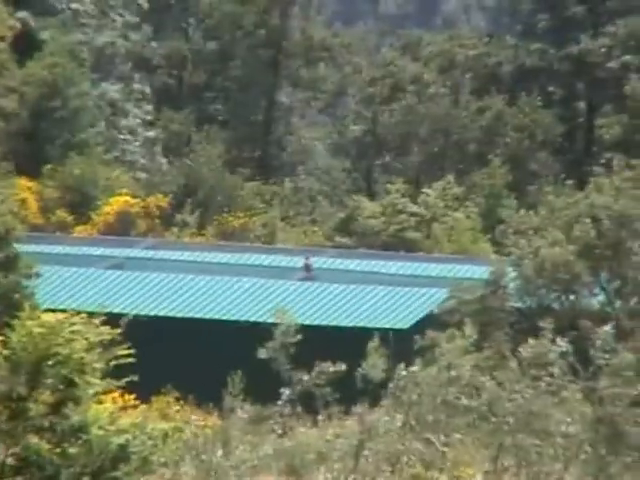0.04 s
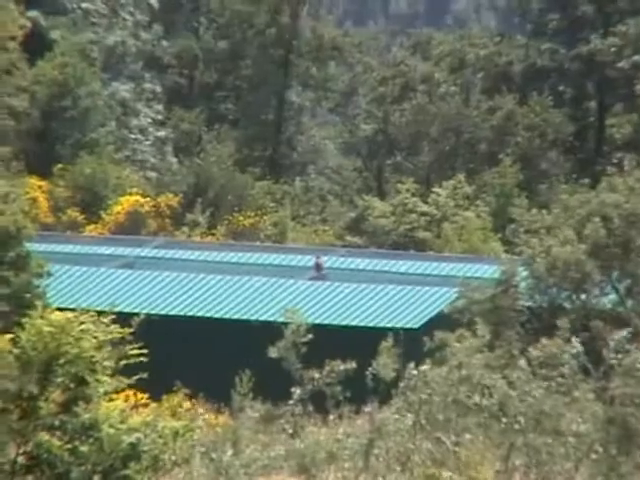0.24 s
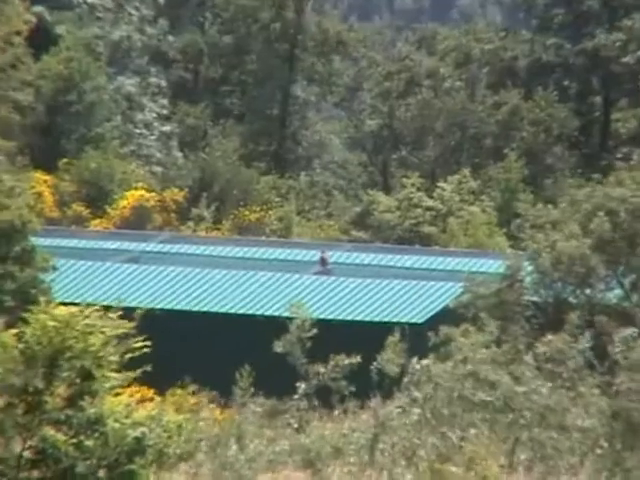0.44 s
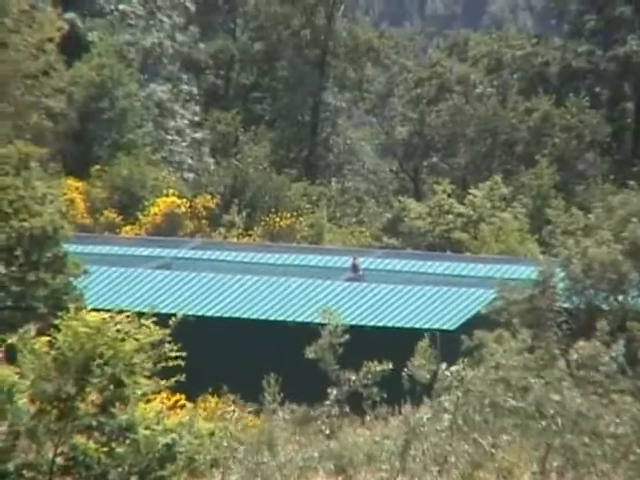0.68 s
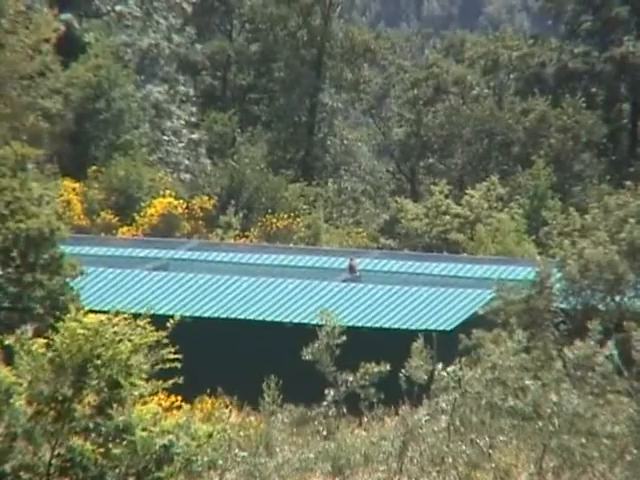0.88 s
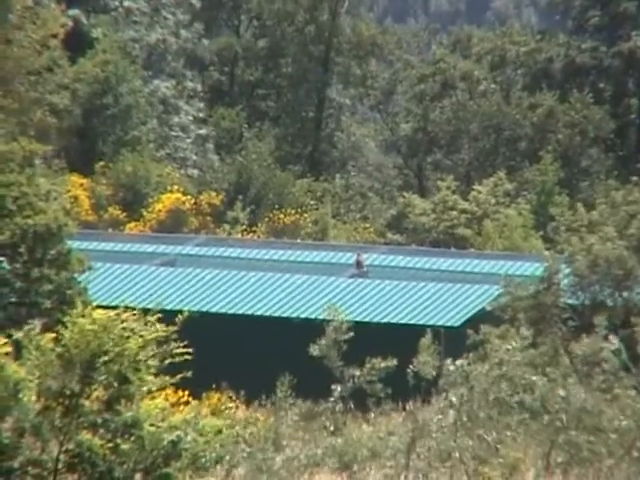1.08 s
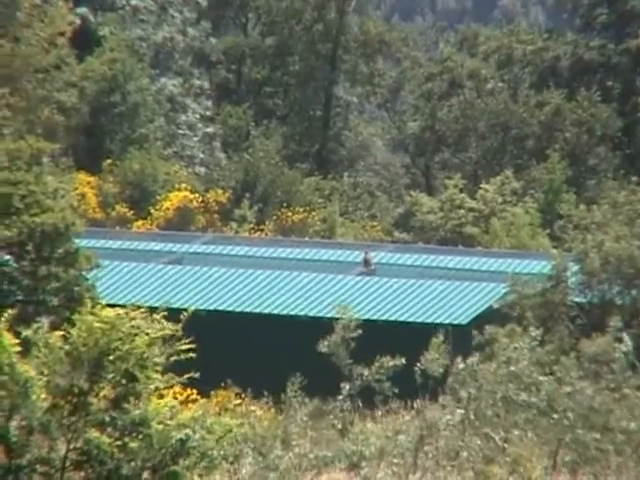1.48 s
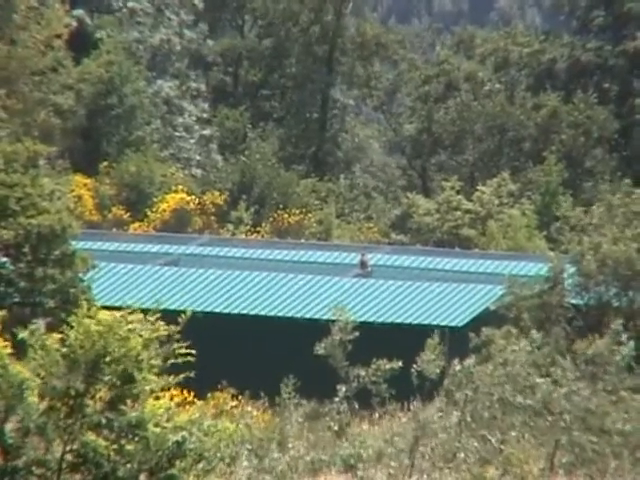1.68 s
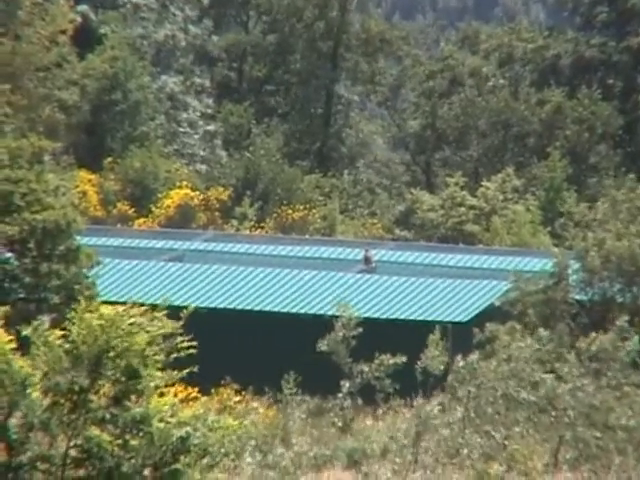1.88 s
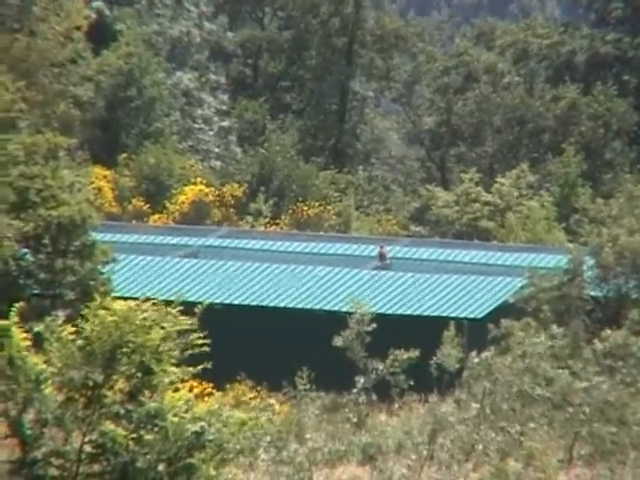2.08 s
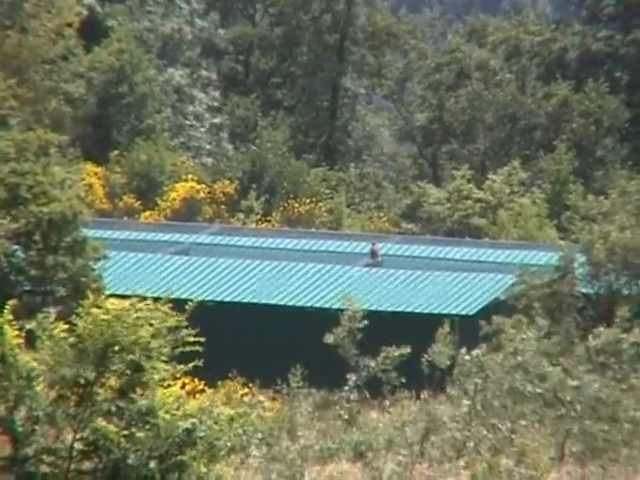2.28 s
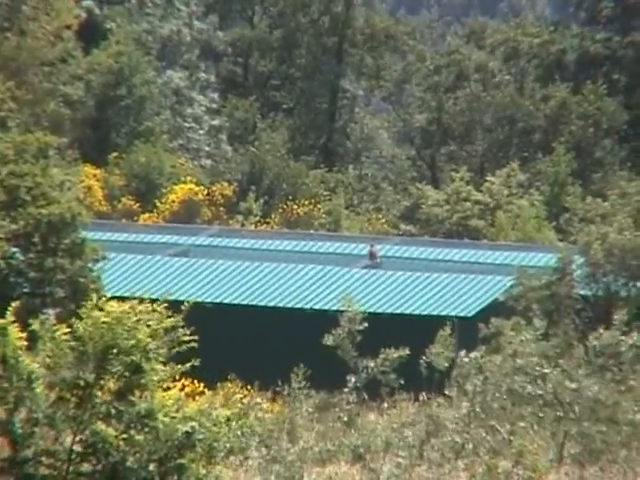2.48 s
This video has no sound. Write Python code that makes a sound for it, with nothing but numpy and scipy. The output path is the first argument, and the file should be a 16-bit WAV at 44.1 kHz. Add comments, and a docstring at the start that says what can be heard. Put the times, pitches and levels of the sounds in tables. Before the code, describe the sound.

Uneven gusts of wind rumble on the microphone, with leaves rustling softly behind.

```python
"""Outdoors in gusty wind, some way from a wood, on a camera's own stereo microphone. The wind
strikes its two ports in puffs, each a short burst of eddies, heard wide and partly in opposite
phase. Far off the trees rush steadily, with two faint chirps; nearer, leaves rustle as the
breeze eases. The camera's own motor adds a very faint whine."""
import sys
import numpy as np
from scipy import signal
from scipy.fft import rfft, irfft, next_fast_len
from scipy.io import wavfile
from scipy.ndimage import uniform_filter1d, map_coordinates

SR = 44100
rng = np.random.default_rng(int(sys.argv[2]) if len(sys.argv) > 2 else 0)


def int16_out(signal):
    """Quantize to a 16-bit WAV file."""
    q = np.round(np.clip(np.atleast_2d(signal).T, -1, 1) * 32767)
    wavfile.write(sys.argv[1], SR, q.astype(np.int16))


N = 116865

# The far trees. Each row: frequency in Hz, relative density in dB.
TREE_SPECTRUM = [(20, -29), (50, 0), (130, 3), (260, 2.5), (430, -2), (580, 0.5), (830, -2), (1100, -1.5),
                 (1400, -3), (1900, -9.5), (3500, -25), (9000, -63)]
# Their width. Each row: frequency in Hz, left-right likeness (1 is mono).
TREE_LIKENESS = [(60, -0.25), (250, 0.21), (600, 0.82), (1400, 0.59)]
# Far chirps, probably birds. Each row: middle and length in seconds, pitch in Hz, level in dB.
FAR_CHIRPS = [(0.733, 0.037, 2770, -64), (1.952, 0.08, 3600, -61)]
# The breeze in the nearby leaves. Each row: time in seconds, level in dB.
BREEZE_LEVEL = [(0, -52.4), (.35, -52), (1.1, -54), (1.9, -55), (2.65, -55)]
# Their rustle. Each row: frequency in Hz, relative density in dB.
LEAF_SPECTRUM = [(500, -19), (1500, -3.5), (2600, 1), (4000, 0.5), (5000, -1), (6500, -1.5), (8500, -4.5),
                 (12000, -8.5), (15700, -11)]
# Its width. Each row: frequency in Hz, left-right likeness.
LEAF_LIKENESS = [(1500, 0.23), (3500, 0.5), (7000, 0.69), (15000, 0.71)]
# Its lean to the left. Each row: frequency in Hz, left over right in dB.
LEAF_PAN = [(4000, 2.5), (8000, 1.1)]
# The motor's whine. Each row: multiple of its rate, level in dB.
MOTOR_OVERTONES = [(7, -83), (8, -80), (9, -78), (11, -76.5), (13, -76), (14, -79), (23, -81)]
# Puffs on the microphone. Each row: peak time and length in seconds, relative level in dB,
# left port over right in dB, tilt in dB per octave.
WIND_PUFFS = [(0.202, 0.04, -48, 9, -12), (0.227, 0.035, -36.5, -4, -6), (0.244, 0.022, -37.5, -1.5, -2.5),
              (0.28, 0.031, -41, -3, -8), (0.358, 0.041, -32.5, -3.5, -3), (0.364, 0.012, -30, -8.5, -0.5),
              (0.381, 0.027, -28, 8.5, -3.5), (0.388, 0.0047, -27, 8, 0.5), (0.413, 0.014, -29.5, 8, 1),
              (0.449, 0.038, -31.5, 0, -3), (0.503, 0.02, -43.5, -10, -2.5), (0.554, 0.034, -39.5, 5, -3),
              (0.641, 0.054, -49.5, 8, -7.5), (0.693, 0.047, -44.5, 13.5, -5.5),
              (0.747, 0.015, -41.5, 17, -3), (0.776, 0.038, -37.5, 5.5, -7.5),
              (0.793, 0.0047, -23.5, 8, -6), (0.806, 0.011, -25.5, 8.5, 1), (0.802, 0.0057, -27, 6.5, 7),
              (0.817, 0.036, -34, 9, 0), (0.85, 0.052, -31, 7, 1.5), (0.905, 0.024, -33.5, 7.5, 0.5),
              (0.929, 0.011, -32, 5, 6), (0.936, 0.025, -26, 5.5, 2), (0.97, 0.049, -31.5, 6.5, 1.5),
              (1.049, 0.049, -40, 6.5, 3.5), (1.067, 0.0071, -32, 6, 2), (1.086, 0.042, -42.5, 8, 1.5),
              (1.116, 0.034, -41, -5, 1.5), (1.217, 0.035, -35.5, 3, 1), (1.238, 0.057, -45, 6.5, -0.5),
              (1.293, 0.027, -43.5, -10, 1), (1.38, 0.057, -43, 1.5, -2.5), (1.431, 0.041, -41.5, 5.5, -3),
              (1.477, 0.049, -45, 5, -2.5), (1.517, 0.014, -34.5, 8, -3.5), (1.555, 0.035, -28, 1, -0.5),
              (1.589, 0.055, -30, -6.5, 1.5), (1.612, 0.0082, -22.5, -4.5, -2), (1.639, 0.032, -34, -8, 0),
              (1.669, 0.037, -29.5, 6.5, 0), (1.713, 0.04, -33.5, 7.5, 2.5), (1.742, 0.045, -35, 5, -0.5),
              (1.852, 0.047, -39.5, 0, 2.5), (1.906, 0.0064, -31, 0, 3), (1.924, 0.032, -32, -0.5, 0.5),
              (1.96, 0.057, -44, 11, -2.5), (2.014, 0.025, -42, -6.5, 1.5),
              (2.081, 0.02, -43.5, 10.5, -0.5), (2.154, 0.045, -45.5, -7.5, -2),
              (2.205, 0.041, -50.5, 3, -4.5), (2.283, 0.049, -45.5, 6.5, -1.5),
              (2.325, 0.027, -47, 10, 0.5), (2.354, 0.011, -36, 9, -2), (2.386, 0.096, -54, 10, -4),
              (2.47, 0.023, -42.5, 2.5, -4)]
# Buffeting at one port. Each row: frequency in Hz, relative density in dB.
BUFFET_SPECTRUM = [(25, -9.5), (60, -12), (130, 0), (280, -1), (450, -6), (700, -17), (1100, -31),
                   (1700, -39), (3000, -52.5), (8000, -63)]
# Air hissing in the port openings. Each row: frequency in Hz, relative density in dB.
HISS_SPECTRUM = [(3000, -36), (9500, 0), (11200, 9), (12300, 27), (13500, -5), (16000, -16)]
# The microphone boosts the difference between its ports. Each row: frequency in Hz, boost in dB.
STEREO_BOOST = [(60, 7.5), (250, 4), (600, 2.5), (3000, 6)]
# The first gusts push the ports harder in opposite directions.
# Each row: time in seconds, gain on their difference in dB.
PORT_OPPOSITION = [(.7, 6.5), (.86, -0.5)]


def amp(db):
    """Decibels to gain."""
    return 10 ** (np.asarray(db) / 20)


def unit(x):
    """Scaled to rms 1."""
    return x / np.sqrt(np.mean(x ** 2) + 1e-20)


def along(points, hz):
    """(Hz, value) points on a log axis."""
    f, v = np.transpose(points)
    return np.interp(np.log(hz + 1), np.log(f + 1), v)


def curve(points):
    """(s, value) points joined by straight lines, one value per sample."""
    return np.interp(np.arange(N) / SR, *np.transpose(points))


def wobble(rate, size=N):
    """A smooth random curve, rate knots a second."""
    return map_coordinates(rng.standard_normal(512), [np.arange(size) * rate / SR], mode="wrap")


def filtered(x, response):
    """x times a response of frequency."""
    m = next_fast_len(N + SR // 4)
    return irfft(rfft(x, m) * response(np.fft.rfftfreq(m, 1 / SR)), m)[..., :N]


def rush(spectrum, likeness, patchy_db):
    """Wind in foliage: stereo noise of rms 1, its level patchy over time and frequency."""
    bins = signal.stft(rng.standard_normal((2, N)), nperseg=512)[2]
    patches = uniform_filter1d(rng.standard_normal(bins.shape[1:]), size=5, axis=0)
    patches = uniform_filter1d(patches, size=12, axis=1)
    noise = signal.istft(bins * amp(patchy_db * unit(patches)), nperseg=512)[1][:, :N]
    angle = lambda hz: np.arccos(np.clip(along(likeness, hz), -1, 1)) / 2
    mid_side_gains = lambda hz: [np.cos(angle(hz)), np.sin(angle(hz))]
    mid, side = filtered(noise, lambda hz: amp(along(spectrum, hz)) * mid_side_gains(hz))
    return unit(np.array([mid + side, mid - side]))


def far_trees(level_db=-52.5, pan_db=3.5):
    """The even rush of the distant wood, a little to the left."""
    wood = rush(TREE_SPECTRUM, TREE_LIKENESS, patchy_db=1.5)
    return amp(level_db) * wood * amp([[pan_db / 2], [-pan_db / 2]])


def far_chirps(smear_hz=110):
    """Each far note swells and fades, its pitch smeared by echoes among the trees."""
    t = np.arange(N) / SR
    notes = np.zeros((2, N))
    for middle, length, pitch, db in FAR_CHIRPS:
        band = filtered(rng.standard_normal((2, N)), lambda hz: np.exp(-((hz - pitch) / smear_hz) ** 2))
        notes += amp(db) * np.exp(-(2 * (t - middle) / length) ** 2) * unit(band)
    return notes


def near_leaves(flutter_db=0.23):
    """Nearby leaves hiss with the breeze and flutter a little."""
    level = amp(curve(BREEZE_LEVEL) + flutter_db * wobble(rate=29.93))
    rustle = level * rush(LEAF_SPECTRUM, LEAF_LIKENESS, patchy_db=1)
    return filtered(rustle, lambda hz: amp(along(LEAF_PAN, hz) * np.array([[.5], [-.5]])))


def camera_motor(rate_hz=300, drift_rad=0.22):
    """Thin, slightly unsteady overtones of the motor, right by the microphone."""
    phase = 2 * np.pi * rate_hz * np.arange(N) / SR
    return np.sqrt(2) * sum(amp(db) * np.sin(multiple * phase + drift_rad * wobble(rate=3.9))
                            for multiple, db in MOTOR_OVERTONES)


def puff(length, tilt_db, size, rise_share=0.41, pivot_hz=238, eddy_db=1, eddies_per_s=170):
    """A burst of eddies at both ports, peaking mid-window; faster air tilts it brighter."""
    hz = np.fft.rfftfreq(size, 1 / SR)
    t = (np.arange(size) - size // 2) / SR
    swell = np.exp(-(t / length / np.where(t < 0, rise_share, 1 - rise_share)) ** 2)
    untilted = amp(along(BUFFET_SPECTRUM, hz))
    colour = untilted * amp(tilt_db * np.log2(np.clip(hz, 50, 830) / pivot_hz))
    strength = np.sqrt(np.mean(swell ** 2) * np.mean(colour ** 2) / np.mean(untilted ** 2))
    ports = []
    for _ in range(2):
        eddies = amp(eddy_db * wobble(eddies_per_s, size=size))
        rumble = irfft(rfft(rng.standard_normal(size)) * colour)
        ports.append(unit(swell * eddies * rumble))
    return strength * np.array(ports)


def wind_on_microphone(gain_db=1.5, low_cut_hz=52, hiss_gain_db=-31.5, hiss_exponent=1.24):
    """Each port feels its own eddies and hisses on the pressure peaks; a wind filter cuts deep bass."""
    size = 12288  # samples in a puff's window
    pressure = np.zeros((2, N + 2 * size))
    for peak, length, db, pan_db, tilt_db in WIND_PUFFS:
        start = round(peak * SR) + size // 2
        port_gains = amp([[db + pan_db / 2], [db - pan_db / 2]])
        pressure[:, start:start + size] += port_gains * puff(length, tilt_db, size)
    wind_filter = lambda hz: hz ** 2 / np.hypot(hz ** 2, low_cut_hz ** 2)
    pressure = filtered(amp(gain_db) * pressure[:, size:size + N], wind_filter)
    air = unit(filtered(rng.standard_normal((2, N)), lambda hz: amp(along(HISS_SPECTRUM, hz))))
    hiss = amp(hiss_gain_db) * np.abs(pressure) ** hiss_exponent * air
    left, right = pressure
    mid = (left + right) / 2
    side = filtered((left - right) / 2, lambda hz: amp(along(STEREO_BOOST, hz)))
    side *= amp(curve(PORT_OPPOSITION))
    return np.array([mid + side, mid - side]) + hiss


def scene():
    """Wind on the microphone in front, everything else well behind it."""
    return wind_on_microphone() + far_trees() + near_leaves() + far_chirps() + camera_motor()


def record(dry):
    """The camera keeps nothing above its band limit."""
    return filtered(dry, lambda hz: hz < 15800)


dry = scene()
out = record(dry)
int16_out(out)
```